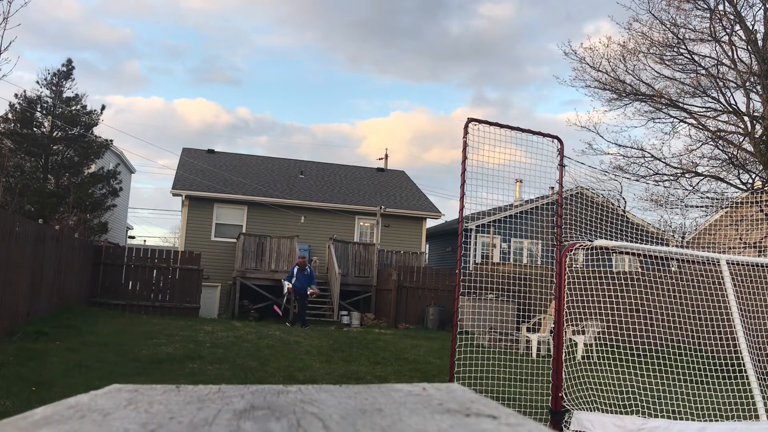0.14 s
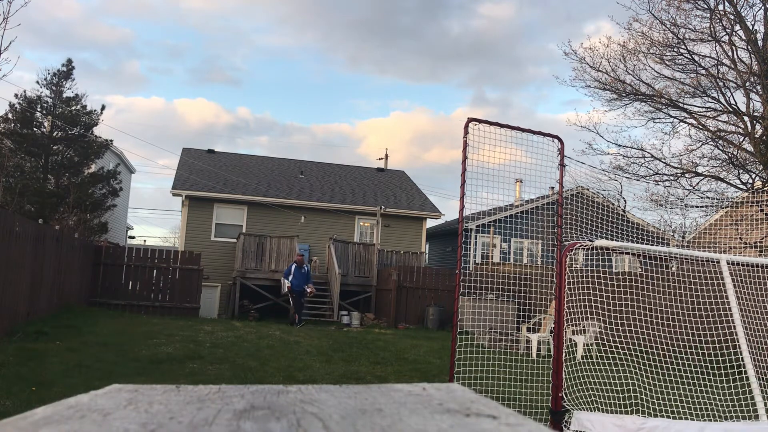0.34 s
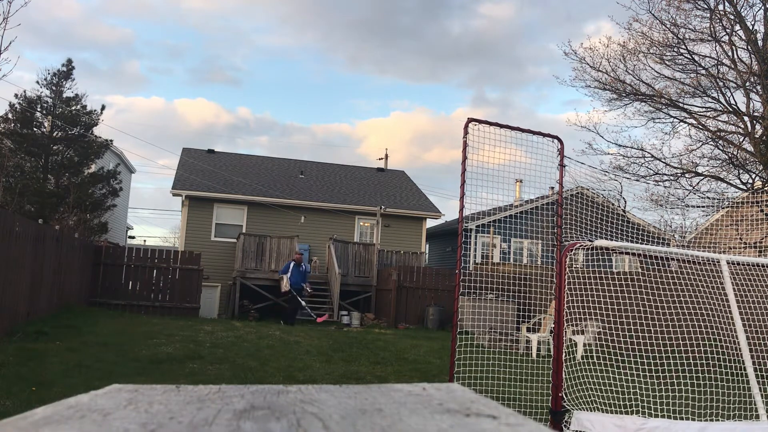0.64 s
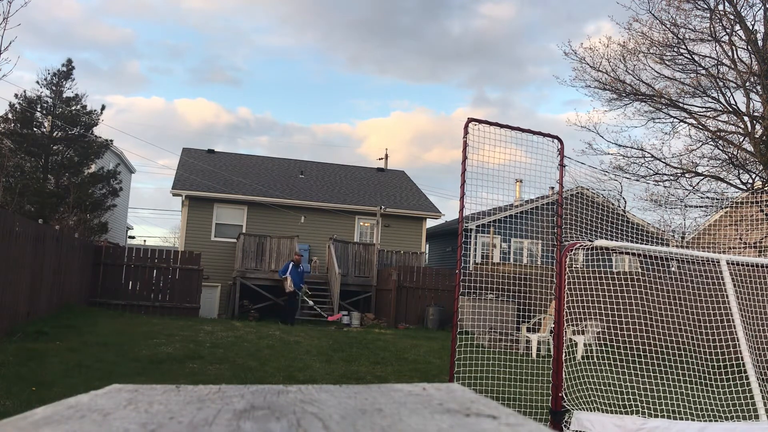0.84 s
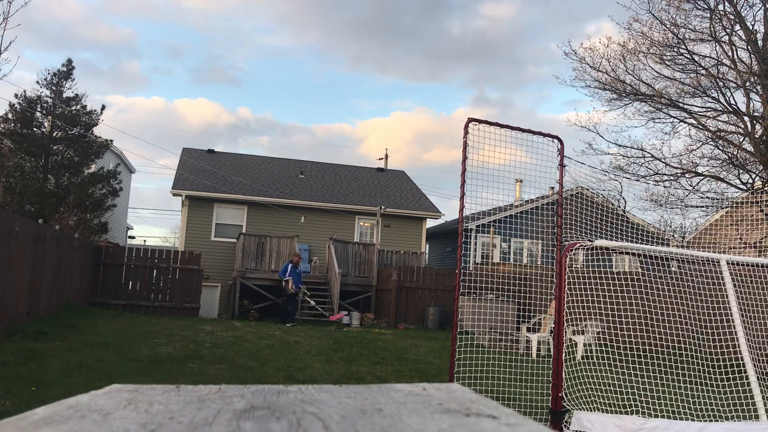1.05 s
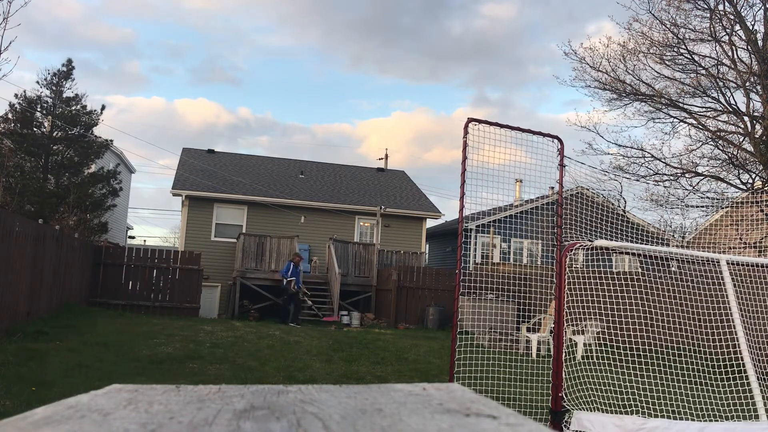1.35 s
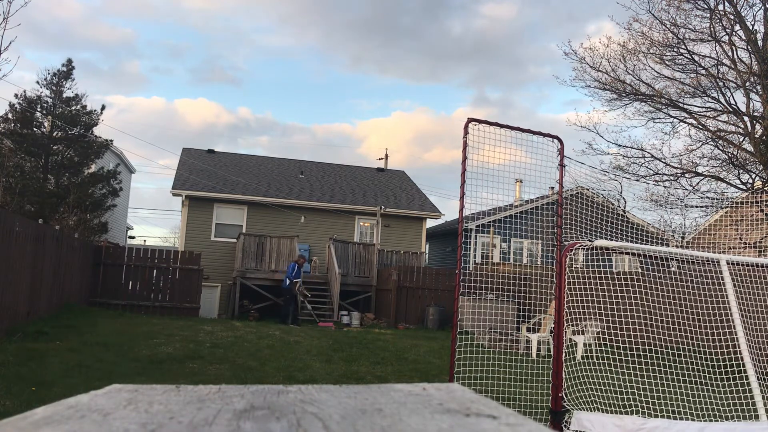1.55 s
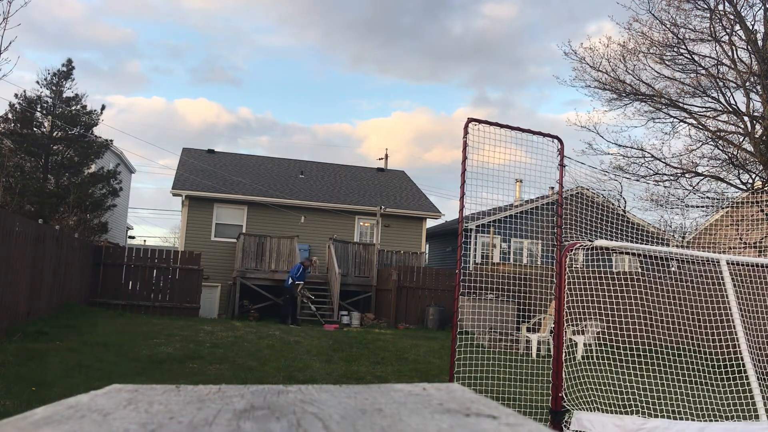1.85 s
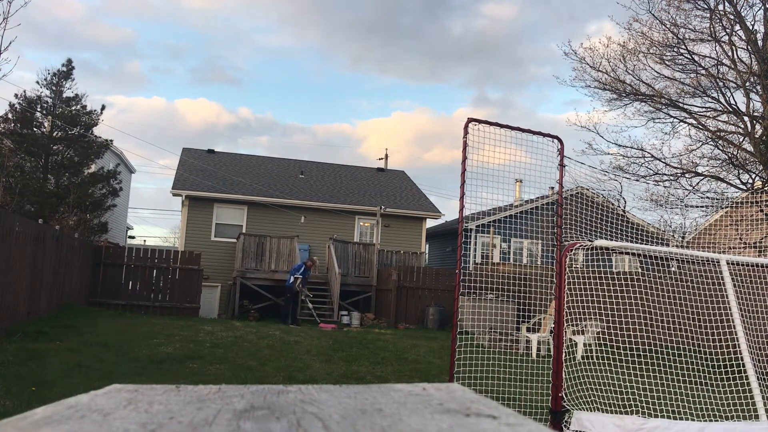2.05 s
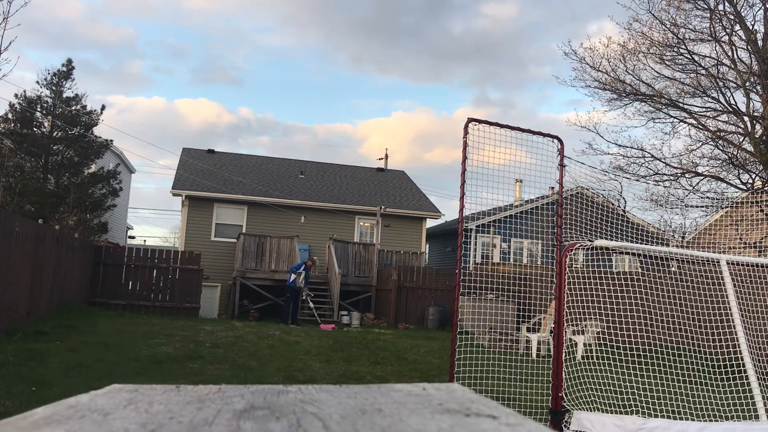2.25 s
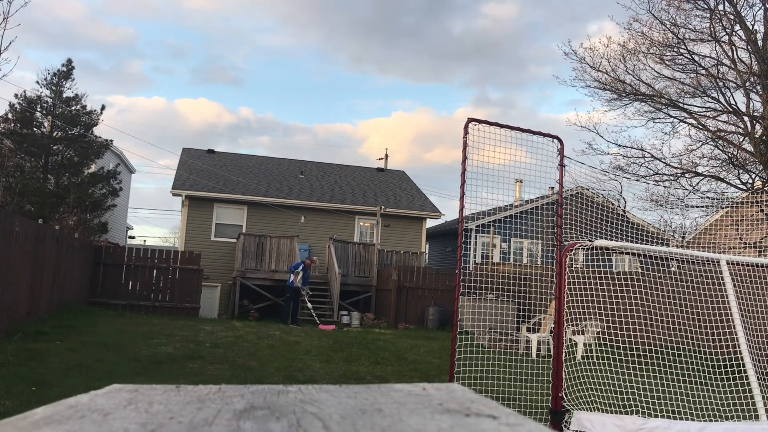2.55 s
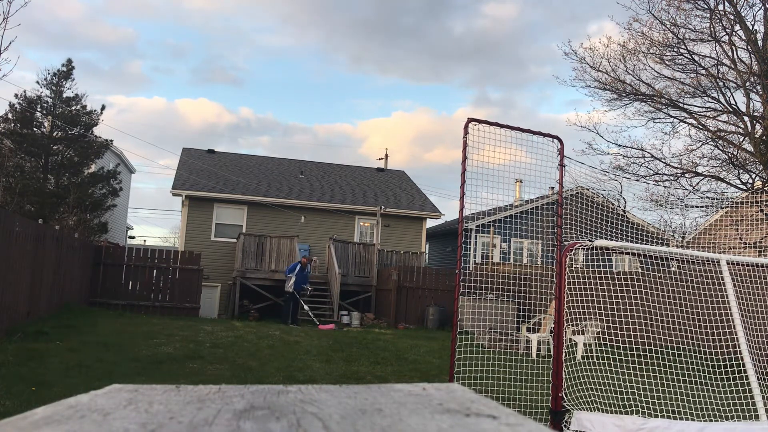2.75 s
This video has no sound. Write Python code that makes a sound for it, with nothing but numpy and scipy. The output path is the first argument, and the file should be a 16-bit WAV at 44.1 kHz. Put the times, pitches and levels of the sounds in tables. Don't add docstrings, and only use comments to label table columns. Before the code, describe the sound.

Close outdoor impact of a rubber puck on a metal-framed net, clacking and rattling with a short dull tail; after a pause come a second knock and softening bounces, with tiny ticks and a quiet distant motor hum.

```python
import sys
import numpy as np
from scipy import signal
from scipy.io import wavfile

SR = 44100
rng = np.random.default_rng(int(sys.argv[2]) if len(sys.argv) > 2 else 0)


def natural_amplitude(level_db):
    exponent = np.asarray(level_db, float) / 20
    return 10 ** exponent


def unload_audio(sound):
    columns = np.transpose(np.atleast_2d(sound))
    steps = np.round(np.clip(columns, -1, 1) * 32767)
    wavfile.write(sys.argv[1], SR, steps.astype(np.int16))


N = 127890


def add(out, start_s, x):
    i = int(start_s * SR)
    out[i:i + len(x)] += x[:len(out) - i]


def rms_one(x):
    return x / np.sqrt(np.mean(x ** 2) + 1e-20)


def band(x, low_hz, high_hz):
    edges_hz = [low_hz, min(high_hz, 0.45 * SR)]
    return signal.sosfilt(signal.butter(2, edges_hz, "band", fs=SR, output="sos"), x)


def drift(rate_hz):
    r = np.exp(-80 * np.pi * rate_hz / SR)
    noise = rng.standard_normal(N // 40 + 2002)
    slow = signal.lfilter([1], [1, -2 * r, r * r], noise)[2000:]
    return np.interp(np.arange(N) / 40, np.arange(len(slow)), rms_one(slow - slow.mean()))


def dying(t60_s):
    t60_s = max(t60_s, 1e-3)
    t = np.arange(int(t60_s * SR)) / SR
    return t, natural_amplitude(-60 * t / t60_s)


def rings(rows, rise_cycles):
    out = np.zeros(N)
    for start_s, peak_db, hz, t60_s in rows:
        t, fall = dying(t60_s)
        shape = fall * (1 - np.exp(-t * hz / rise_cycles))
        add(out, start_s, natural_amplitude(peak_db) * shape / shape.max() * np.sin(2 * np.pi * hz * t))
    return out


def knocks():
    # t/s, peak level/dB, f/Hz, t60/s
    contacts = [(.2268, -40, 4500, .004), (.2490, -37, 1030, 0.012), (.2607, -45, 1510, .008),
                (.2667, -30, 3650, 0.008), (0.2665, -38, 7600, .003), (.2765, -24, 3250, 0.0087),
                (.2770, -24, 5950, 0.0023), (.2900, -34.5, 6200, 0.0034), (.3060, -39.5, 2680, 0.0081),
                (0.349, -32.5, 2840, 0.0084), (0.3751, -34.5, 4180, 0.0036), (.3990, -40, 840, 0.0095),
                (1.6850, -38, 1700, 0.01), (1.698, -35.5, 5040, 0.012), (1.6990, -26.5, 4890, 0.0034),
                (1.7105, -36.5, 5100, .008), (1.9857, -49, 2300, .008), (1.9930, -48.5, 2780, 0.014),
                (2.1787, -52.5, 1960, 0.013), (2.1930, -57, 4730, .008), (2.2850, -65, 4800, 0.017),
                (2.3345, -61, 4740, .012), (2.3480, -62, 4500, .008), (2.5896, -70, 1900, .01)]
    spread, side_db = 1.2, -7
    rows = []
    for start_s, db, hz, t60_s in contacts:
        rows.append((start_s, db - 3, hz, t60_s))
        rows.append((start_s, db + side_db, hz * spread, t60_s))
        rows.append((start_s, db + side_db, hz / spread, t60_s))
    return rings(rows, rise_cycles=1.0)


def thuds():
    # t/s, peak level/dB, f/Hz, t60/s
    pushes = [(.2490, -37, 378, 0.051), (.2660, -30, 200, 0.042), (.2720, -29, 91, 0.061),
              (.2775, -25, 730, 0.014), (.3000, -44, 644, 0.096), (.3490, -37.5, 415, 0.022),
              (.3750, -42, 490, 0.016), (.3992, -41.5, 299, 0.035), (.3995, -37.5, 586, 0.0067),
              (1.6860, -42.5, 545, 0.018), (.2620, -38.5, 1046, 0.079), (2.3340, -47, 610, 0.013),
              (.4150, -41, 157, .08), (.8000, -57, 221, 0.14), (1.6855, -35, 316, 0.048),
              (1.6990, -35, 886, 0.018), (1.7100, -38, 198, 0.057), (1.8550, -46, 393, 0.01),
              (1.9560, -40.5, 243, 0.039), (1.9850, -46.5, 300, 0.097), (2.1790, -35, 296, 0.013),
              (2.2820, -43.5, 300, 0.014), (2.3345, -39, 225, 0.034), (2.3950, -46, 300, 0.041),
              (2.5900, -39.5, 209, 0.018), (2.6150, -46, 167, 0.15)]
    return band(rings(pushes, rise_cycles=0.085), 48, 2700)


def rattles():
    # t/s, rms level/dB, low edge f/Hz, high edge f/Hz, t60/s
    bursts = [(0.2275, -48.5, 2140, 16000, 0.16), (0.2493, -41.5, 400, 4900, .1),
              (0.26, -39.5, 300, 4760, 0.0916), (0.265, -35, 2290, 4350, 0.0833),
              (.2760, -36, 3980, 14900, .015), (0.2952, -45, 3430, 15300, 0.26),
              (.2970, -45.5, 194, 1240, .28), (.2990, -45, 1350, 5100, .35), (0.3985, -45.5, 150, 990, .12),
              (.2967, -48, 14500, 16500, .15), (.2969, -47.5, 8000, 11200, .1),
              (0.359, -62.5, 5030, 10500, .5), (1.6854, -42, 308, 6400, .08),
              (1.708, -62, 6400, 12000, 0.135), (1.7050, -55.5, 3960, 6400, 0.4),
              (1.708, -54, 414, 3830, 0.44), (1.9847, -58, 1500, 3450, .08), (2.0000, -66, 1000, 3800, .5),
              (2.1773, -58.5, 485, 3900, 0.19), (2.198, -59, 604, 3100, .2), (2.2810, -59, 149, 970, .45),
              (2.3353, -64, 296, 5500, 0.21), (1.8400, -66, 890, 5230, 0.38),
              (2.5905, -68.5, 400, 3140, 0.2074)]
    grains_per_s, grain_spread_db = 12000, 1.5
    clump_db, clumps = 2.2, drift(120)
    out, size = np.zeros(N), SR // 2
    for start_s, db, low_hz, high_hz, t60_s in bursts:
        hit = rng.random(size) < grains_per_s / SR
        strength = natural_amplitude(grain_spread_db * rng.exponential(1, size))
        grit = hit * strength * rng.standard_normal(size)
        grit = grit * natural_amplitude(clump_db * np.roll(clumps, -int(start_s * SR) - int(low_hz))[:size])
        fall = dying(t60_s)[1][:size]
        coloured = rms_one(band(grit, low_hz, high_hz))[-len(fall):]
        add(out, start_s, natural_amplitude(db) * band(coloured * fall, low_hz, high_hz))
    return out


def tube():
    # f/Hz, level/dB, t60/s
    modes = [(2400, -18, .2), (3951, -6, .25), (4430, -9, .25), (5760, -14, .3), (5843, -10, .4),
             (6500, -12, .3), (6616, -1, .6), (6750, -11, .3), (6950, -14, .2), (7483, -14, .15),
             (9292, -17, .12)]
    # t/s, peak level/dB
    blows = [
        (.2968, -47),
        (.3100, -54),
        (.3500, -57.5),
        (0.396, -63),
    ]
    buzz_depth, buzz_hz = 0.75, 60
    out = 0
    for hz, level_db, t60_s in modes:
        flutter = 1 + buzz_depth * drift(buzz_hz)
        rows = [(start_s, db + level_db + rng.normal(0, 2), hz, t60_s) for start_s, db in blows]
        out = out + flutter * rings(rows, rise_cycles=1.5)
    return out


def yard(x):
    level_db, t60_s, cut_hz, gap_s = -12.5, 0.55, 4460, 0.0099
    fall = dying(t60_s)[1]
    wash = band(rng.standard_normal(N), 110, cut_hz)[:len(fall)] * fall
    answer = np.zeros(N)
    add(answer, gap_s, wash)
    return natural_amplitude(level_db) * signal.fftconvolve(x, answer / np.sqrt(np.sum(answer ** 2)))[:N]


def far_echo():
    centre_s, width_s, level_db, hz = 0.868, 0.078, -72, 2970
    swell = np.exp(-0.5 * ((np.arange(N) / SR - centre_s) / width_s) ** 2)
    return natural_amplitude(level_db) * swell * rms_one(band(rng.standard_normal(N), hz / 1.48, hz * 1.3))


def ticks():
    # t/s, peak level/dB
    clicks = [
        (0.0791, -73),
        (0.9064, -49.5),
        (1.238, -61),
        (1.3298, -57),
        (1.5383, -62),
        (1.8376, -61.5),
        (2.139, -53),
        (2.3347, -50),
        (2.7032, -55.5),
    ]
    low_hz, trim_db = 8600, 7
    out = np.zeros(N)
    for start_s, db in clicks:
        out[int(start_s * SR)] = natural_amplitude(db + trim_db)
    return band(out, low_hz, SR)


def hum():
    # f/Hz, rms level/dB, width/Hz
    tones = [(72.3, -51.5, 3.4), (36.5, -64, 6.5), (58, -66, 6.0), (121, -67, 4.0), (148.8, -73, 4.0)]
    steady = 0.78
    t, out = np.arange(N) / SR, 0
    for hz, db, width_hz in tones:
        wander = steady + (1 - steady) * (drift(width_hz) + 1j * drift(width_hz))
        turning = np.exp(2j * np.pi * (hz * t + rng.random()))
        out = out + natural_amplitude(db) * rms_one(np.real(wander * turning))
    return out


def floor():
    # f/Hz, level/dB
    colour = [(25, -20.5), (90, -8.5), (220, -24.5), (900, -31.5), (1500, -41), (4000, -45.5),
              (9000, -53.5), (16000, -52.5)]
    total_db, flicker_db, flicker_hz = -58.5, 0.5, 7.7
    edges_hz = 22 * 2 ** np.arange(0, 9.6, 0.5)
    white = rng.standard_normal((2, N + SR))
    hz, db = np.transpose(colour)
    out = 0
    for k, (low, high) in enumerate(zip(edges_hz, edges_hz[1:])):
        level_db = np.interp(np.log(low * high) / 2, np.log(hz), db) + flicker_db * drift(flicker_hz)
        out = out + natural_amplitude(level_db) * band(white[k % 2], low, high)[SR:]
    return natural_amplitude(total_db) * rms_one(out)


def scene():
    sharp = knocks()
    body = thuds() + rattles() + tube()
    answer = yard(natural_amplitude(-6) * sharp + body)
    background = far_echo() + ticks() + hum() + floor()
    return (sharp + body + answer + background)[None]


def low_pass(x):
    return signal.sosfilt(signal.butter(12, 16020, fs=SR, output="sos"), x)


def record(dry):
    low_hz, top_hz = 26, 16120
    cut = signal.sosfilt(signal.cheby2(14, 60, top_hz + 250, fs=SR, output="sos"), dry)
    cut = signal.sosfilt(signal.butter(2, low_hz, "high", fs=SR, output="sos"), cut)
    return low_pass(cut)


dry = scene()
out = record(dry)
unload_audio(out)
```